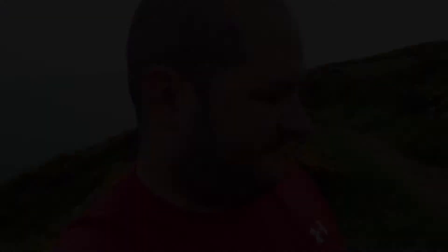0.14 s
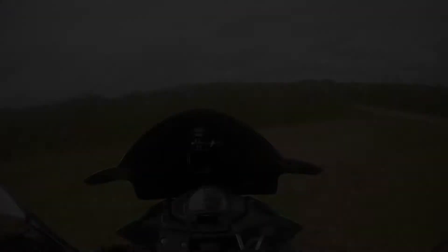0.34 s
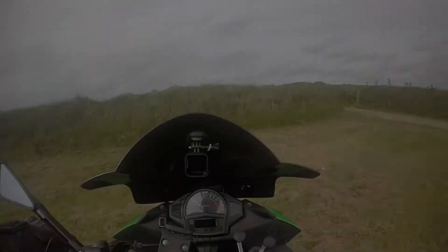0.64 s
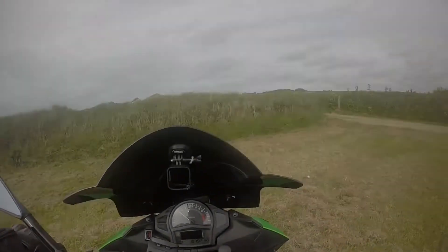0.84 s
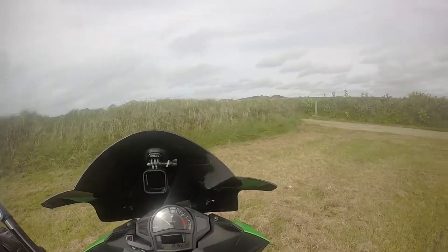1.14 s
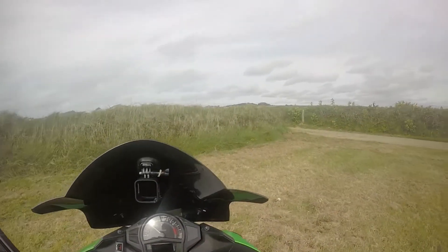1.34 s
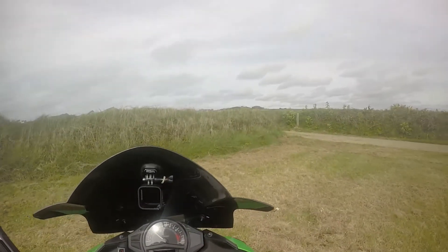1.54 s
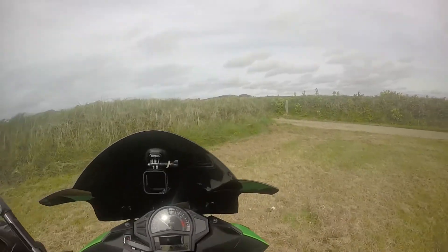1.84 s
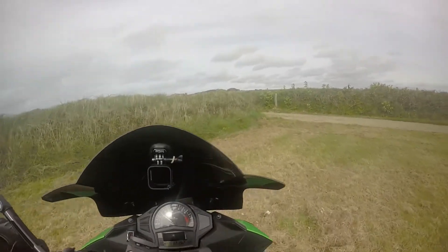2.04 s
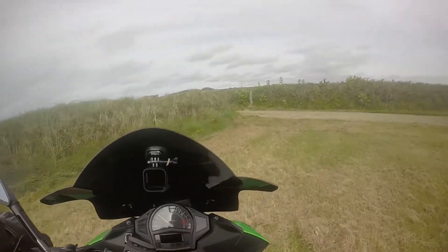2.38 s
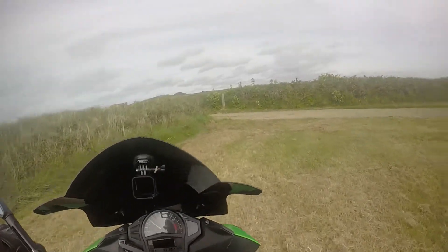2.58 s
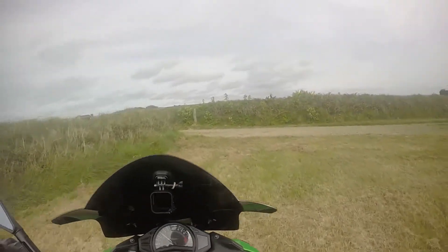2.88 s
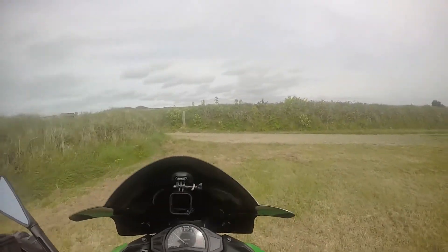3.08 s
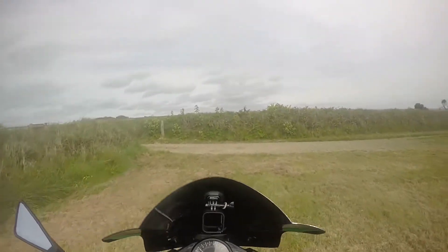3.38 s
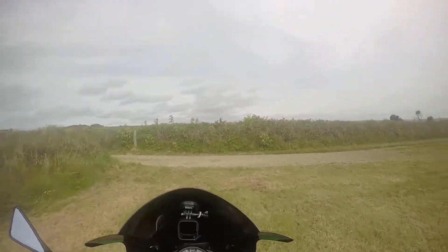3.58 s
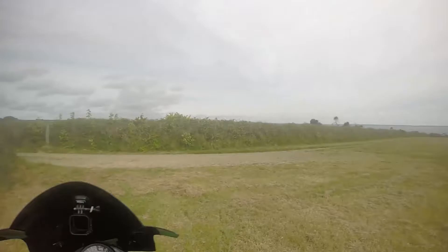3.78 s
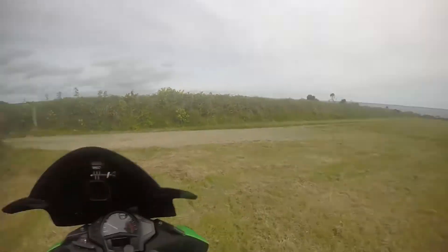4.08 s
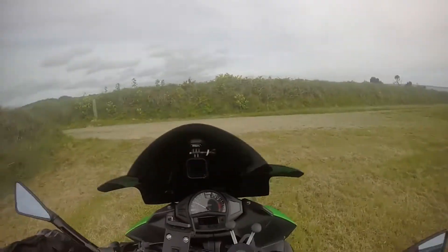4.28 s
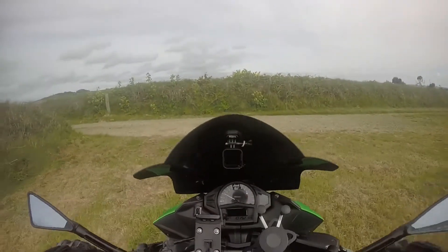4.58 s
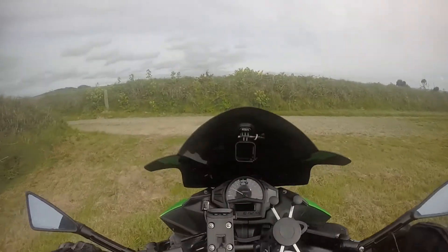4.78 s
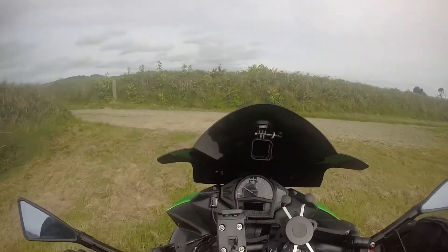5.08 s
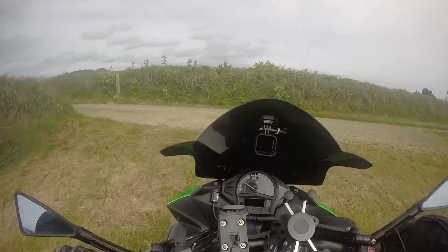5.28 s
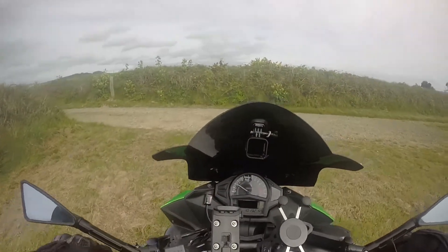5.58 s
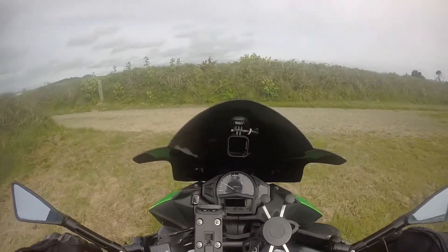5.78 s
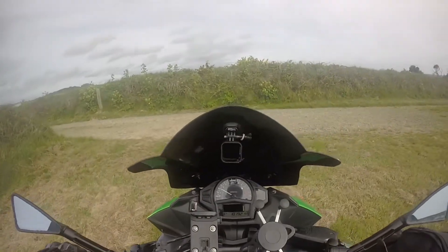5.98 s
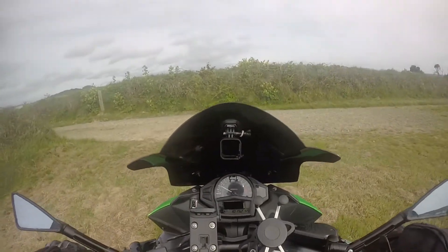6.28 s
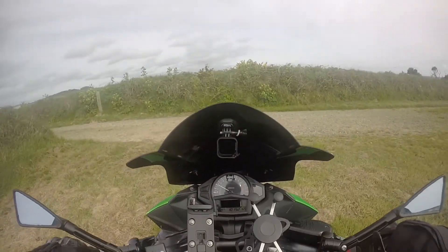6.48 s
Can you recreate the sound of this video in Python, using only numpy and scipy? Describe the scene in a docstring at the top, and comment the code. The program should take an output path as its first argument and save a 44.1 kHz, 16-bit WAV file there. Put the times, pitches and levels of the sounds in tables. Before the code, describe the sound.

From the rider's head, outdoors with hardly any echo: a brief quiet breeze gives way to a motorcycle twin swelling up over most of a second. Its deep, throaty throb rises and falls slightly, with an airy intake hiss. Halfway it drops and stumbles, clunks softly through the frame, coughs, then idles lower and lumpier. Loose fairing plastic buzzes and ticks, while tyres swish faintly through taller grass.

```python
"""Dry grass and gravel beside a hedge: a parallel-twin motorcycle rolls past them, heard at the rider's helmet.
A faint filtered-noise breeze fades out and the engine fades in on a little throttle.
At 3.3 s the throttle shuts and it stumbles down to idle: paired firing impulses boom in tuned resonances.
Shaped noise adds gas rasp, gear whirr, valve and intake hiss, tyres in grass and frame rumble.
Loose plastic buzzes on the hardest pressure swings and ticks at set moments."""
import sys
import numpy as np
from scipy import signal
from scipy.fft import rfft, irfft, next_fast_len
from scipy.io import wavfile
from scipy.ndimage import uniform_filter1d, map_coordinates

SR = 44100
rng = np.random.default_rng(int(sys.argv[2]) if len(sys.argv) > 2 else 0)


def materialize(psi):
    """Save the field psi as 16-bit PCM at rate SR to the path in sys.argv[1].

    A 1-D psi becomes a single channel; in a 2-D psi each row is a channel.
    """
    bounded = np.clip(np.atleast_2d(psi).T, -1, 1)
    quanta = np.round(bounded * 32767).astype(np.int16)
    wavfile.write(sys.argv[1], SR, quanta)


N = 292383
TIME = np.arange(N) / SR

# the throttle is open until SHUT_S, then its airflow dies away with time constant CLOSE_S
SHUT_S, CLOSE_S = 3.26, 0.19
# coasting: gears and valves run quieter (centre s, half length s)
COAST = (3.85, 0.45)


def amp(db):
    """Decibels to gain."""
    return 10 ** (np.asarray(db) / 20)


def unit(x):
    """Scale to rms 1."""
    return x / np.sqrt(np.mean(x ** 2) + 1e-20)


def along(points, hz):
    """Read (Hz, value) points on a log frequency axis."""
    f, v = np.transpose(points)
    return np.interp(np.log(hz + 1), np.log(f + 1), v)


def wobble(rate):
    """A smooth random curve with rate knots a second."""
    knots = rng.standard_normal(int(N * rate / SR) + 4)
    return map_coordinates(knots, [TIME * rate])


def swell(s, half_s):
    """A bell of height 1 around the moment s."""
    return np.exp(-((TIME - s) / half_s) ** 2)


def filtered(x, response):
    """Shape x by a complex response of frequency."""
    size = next_fast_len(N + SR // 2)
    spectrum = rfft(x, size) * response(np.fft.rfftfreq(size, 1 / SR))
    return irfft(spectrum, size)[..., :N]


def ring(x, modes):
    """Pass x through parallel resonances; listed neighbours swing against each other."""
    def response(f):
        total = 0
        for k, (centre, width, db) in enumerate(modes):
            damping = 1j * f * width
            total = total + (-1) ** k * amp(db) * damping / (centre * centre - f * f + damping)
        return total
    return filtered(x, response)


def kicks(times, sizes):
    """One impulse at each time."""
    return np.bincount(np.round(times * SR).astype(int), sizes, N)[:N]


def rush(spectrum, alike=None):
    """Stereo noise of rms 1: mid and side are balanced to set how alike left and right are."""
    # default left-right likeness: f/Hz, correlation (0-1)
    likeness = [(150, .97), (600, .95), (1000, 0.8), (2000, .45), (4000, 0.4), (12000, 0)] if alike is None else alike

    def mid_side(hz):
        turn = np.arccos(np.clip(along(likeness, hz), -1, 1)) / 2
        return amp(along(spectrum, hz)) * [np.cos(turn), np.sin(turn)]
    mid, side = filtered(rng.standard_normal((2, N)), mid_side)
    return unit(np.array([mid + side, mid - side]))


def throttle(at=TIME):
    """Airflow through the throttle, 1 open to 0 shut."""
    return np.exp(-np.maximum(at - SHUT_S, 0) / CLOSE_S)


def bark(soft=0.14):
    """Sharpness of the exhaust's pressure fronts, soft between the moments when it hardens to a bark."""
    # barks of the exhaust: t/s, half length/s, added sharpness
    barks = [(1.1, .2, 0.2), (2.698, 0.14, 0.4), (4.002, .23, 1.1), (4.848, 0.69, 0.3)]
    return soft + sum(sharpness * swell(s, half_s) for s, half_s, sharpness in barks)


def loaded(idle_db, open_db, coast_db):
    """Gain of a moving part: raised by open throttle, lowered while the engine coasts."""
    return amp(idle_db + open_db * throttle() - coast_db * swell(*COAST))


def breeze(level_db=-50):
    """Soft wind over open ground: mostly low noise with a lightly fluttering level."""
    # wind spectrum: f/Hz, relative level/dB
    wind_spectrum = [(18, -30), (30, -3), (76, 1), (274, -11.5), (311, -10), (383, -10.5), (766, -16.5),
                     (1250, -19.5), (1490, -18.5), (14000, -53.5)]
    return amp(level_db + 1.9 * wobble(12)) * rush(wind_spectrum)


def hedge(pressure, echo_db=-24, t60=0.11):
    """The ground and the hedge scatter a faint answer: a decaying noise tail, unlike on the two sides."""
    t = TIME[:SR // 4]
    tail = rng.standard_normal((2, len(t))) * amp(-60 * t / t60)
    tail = tail / np.linalg.norm(tail[0])
    return amp(echo_db) * signal.fftconvolve(pressure[None], tail, axes=1)[:, :N]


def tyres(short_grass_db=-70.5, tuft_s=0.1, grit_db=2.0):
    """The tyres crackle through dry grass as gritty treble noise, swishing louder in taller tufts."""
    # taller tufts: t/s, level/dB over the short grass
    tufts = [(1.081, 10.5), (2.72, 5), (3.82, 6), (5.72, 2.5), (6.23, 8)]
    # grass spectrum: f/Hz, relative level/dB
    grass_spectrum = [(3000, -40.5), (7000, -8.5), (10500, 0), (13000, -2.5), (15500, -6)]
    level_db = short_grass_db + sum(db * swell(s, tuft_s) for s, db in tufts)
    crackle = unit(amp(grit_db * wobble(900)))
    return amp(level_db) * crackle * rush(grass_spectrum) * amp([[-2.5], [2.5]])


def shudder(steady_db=-39.5, slack_db=-24):
    """Chain and frame rumble, most when the drive goes slack just after the throttle shuts."""
    # rumble spectrum: f/Hz, relative level/dB
    rumble_spectrum = [(15, -20), (30, -5.5), (55, -1.5), (75, 2), (130, -2.5), (200, -9), (400, -43),
                       (800, -91)]
    slack = swell(3.385, 0.095)  # centre s, half length s
    return (amp(steady_db) + amp(slack_db) * slack) * rush(rumble_spectrum, [(100, 1.0)])


def intake(level_db=-62):
    """Air hisses through the open intake and dies away with the throttle's airflow."""
    # intake spectrum: f/Hz, relative level/dB
    intake_spectrum = [(1600, -42), (1950, 9), (2250, -12.5), (2850, 0.5), (3400, -14), (7000, -16),
                       (8000, -5.5), (8600, -13), (10000, -28)]
    return amp(level_db) * throttle() * rush(intake_spectrum) * amp([[-1], [1]])


def valves(pulse):
    """The valve gear hisses, pulsing with the firings and flickering fast at random."""
    # hiss spectrum: f/Hz, relative level/dB
    hiss_spectrum = [(600, -39.5), (1500, -2), (1980, 3), (2400, 0), (2850, -1.5), (3800, -4), (5000, -6),
                     (6300, -9.5), (8200, -13), (9300, -16), (15000, -29)]
    flicker = unit(pulse * amp(2.2 * wobble(400)))
    level = loaded(idle_db=-55.5, open_db=2.1, coast_db=1.8)
    return level * flicker * rush(hiss_spectrum) * amp([[-.4], [.4]])


def gears(pulse):
    """The gears whirr as midrange noise that pulses with the firings."""
    # whirr spectrum: f/Hz, relative level/dB
    whirr_spectrum = [(60, -30.5), (150, 7.5), (290, 14.5), (350, 9.5), (430, 14), (560, 13.5), (700, 5.5),
                      (830, 4.5), (1000, 1.5), (1120, -2.5), (1177, 4.5), (1290, -6.5), (1750, -9),
                      (3500, -52)]
    return loaded(idle_db=-37, open_db=0.35, coast_db=3.6) * pulse * rush(whirr_spectrum)


def gas(flow, level_db=-46):
    """Gas rasps with each firing: noise follows the flow and gains from the bark."""
    # rasp spectrum: f/Hz, relative level/dB
    rasp_spectrum = [(170, -29), (260, -1), (330, -1.5), (420, 2), (560, -0.5), (650, -3.5), (720, -3),
                     (820, -5), (1000, -18), (1400, -23.5), (2500, -69.5)]
    return amp(level_db) * (1 + bark()) * flow * rush(rasp_spectrum, [(500, 1.0)])


def running(pressure, throb=0.38):
    """Noise of the moving bike: smoothed pressure power drives the gas and throbs in gears and valves."""
    power = np.abs(uniform_filter1d(pressure ** 2, size=300))
    flow = unit(power ** 0.41)
    pulse = unit(1 + throb * flow)
    return gas(flow) + gears(pulse) + valves(pulse) + intake() + tyres()


def rattle(pressure, push_slack=0.29, pull_slack=0.3, pull_share=.9, buzz_db=-33.5, scatter_db=1.5,
           tick_db=-7.5, tick_s=.0009):
    """Loose plastic buzzes when a pressure swing exceeds its slack, and ticks sharply at listed moments."""
    # plastic ticks: t/s, level/dB before the tick_db trim
    ticks = [(1.7983, -36.5), (1.9656, -38.5), (2.007, -35), (2.173, -37), (2.254, -37.5), (3.53, -35),
             (4.1031, -36), (4.1584, -35), (5.239, -35), (5.4056, -33.5), (5.7406, -34), (6.1875, -34),
             (6.2981, -37), (6.576, -37.5)]
    # plastic spectrum: f/Hz, relative level/dB
    plastic_spectrum = [(500, -30), (1500, 5.5), (2600, 2.5), (4500, -2.5), (7500, -11.5), (11000, -11),
                        (15500, -16)]
    push = np.maximum(pressure - push_slack, 0)
    pull = np.maximum(-pressure - pull_slack, 0)
    # the plastic answers the swing 0.8 ms later
    excess = np.interp(TIME - .0008, TIME, push + pull_share * pull)
    force = amp(buzz_db + scatter_db * wobble(70)) * excess
    for s, db in ticks:
        # each tick peaks 1 ms after its listed time
        force = force + amp(db + tick_db) * np.exp(-abs(TIME - s - .001) / tick_s)
    return force * rush(plastic_spectrum, [(1000, 0.81), (8000, .4)]) * amp([[-2], [2]])


def firings(cycle, scatter_db=0.12, second_db=-2, coast_second_db=0.46, rebound_db=2,
            steady_jitter_s=.00005, idle_jitter_s=.00013):
    """Firing times and sizes: the second cylinder trails by about half a crank turn; idle is less even."""
    # weak firings: t/s, level/dB against a normal firing
    misfires = [(3.342, -6), (3.517, -13.5), (4.146, -14.5)]
    lag = .24  # in cycles of two crank turns
    starts = np.arange(1, int(cycle[-1] - lag) + 1)
    times = np.interp(np.add.outer(starts, [0, lag]).ravel(), cycle, TIME)
    jitter_s = steady_jitter_s + idle_jitter_s * (1 - throttle(times))
    times = times + jitter_s * rng.standard_normal(len(times))
    # the second cylinder is weaker, a little less so while coasting
    offset_db = second_db + coast_second_db * np.interp(times, TIME, swell(*COAST))
    is_second = np.arange(len(times)) % 2
    db = offset_db * is_second + scatter_db * rng.standard_normal(len(times))
    for s, weak_db in misfires:
        weak = np.argmin(abs(times - s))
        db[weak] += weak_db
        # the firing after a weak one comes harder
        db[weak + 1] += rebound_db
    return times, amp(db)


def pipes(times, sizes, open_db=0.5, idle_db=0.02):
    """Firings boom in airbox and exhaust, crossfading from open-throttle to shut-throttle resonances."""
    # resonances with the throttle open: f/Hz, width/Hz, level/dB
    pipe_open = [(84, 9.9, 38), (140.6, 66.04, 48), (161.43, 68.45, 47), (345, 40.3, 26), (425, 126, 26),
                 (712.6, 73.2, 29.5), (708.3, 77.4, 28.5), (591.8, 57, 24)]
    # resonances with the throttle shut: f/Hz, width/Hz, level/dB
    pipe_shut = [(95.3, 46.1, 40.35), (72.15, 18.3, 42.13), (145.13, 58.93, 47.8), (153.7, 77.4, 46.7),
                 (350.9, 133.2, 39.8), (364.3, 183.4, 39.0), (628.8, 150.9, 33.7), (641.7, 110.2, 32.7)]
    # part of each blow that the bark brings out: f/Hz, level/dB
    edge = [(380, -32.5), (500, -6), (650, -1.5), (780, 11), (880, -4), (1100, -33)]
    opening = throttle(times)
    open_boom = amp(open_db) * ring(kicks(times, sizes * opening), pipe_open)
    shut_boom = amp(idle_db) * ring(kicks(times, sizes * (1 - opening)), pipe_shut)
    boom = open_boom - shut_boom
    # a steeper pressure front carries more upper harmonics
    return boom + bark() * filtered(boom, lambda hz: amp(along(edge, hz)))


def casing(times, sizes):
    """Each firing knocks the engine casing with its own random strength and makes it ring."""
    # casing resonances: f/Hz, width/Hz, level/dB
    casing_modes = [(701, 49, 7), (796, 69, 1.5), (950, 77, -16), (1177, 44, -4.5)]
    strength = amp(1.3 * rng.standard_normal(len(times)))
    return ring(kicks(times, sizes * strength), casing_modes)


def engine(cycle, muffle_hz=1050):
    """Pipe boom and casing knock pass the silencer; slow engine rocking is added as sines."""
    times, sizes = firings(cycle)
    blows = pipes(times, sizes) + casing(times, sizes)
    # rocking at once and twice the cycle rate
    rocking = amp(-42) * np.sin(2 * np.pi * cycle) + amp(-48) * np.sin(4 * np.pi * cycle)
    # the silencer rounds off each blow
    return filtered(blows, lambda hz: 1 / np.sqrt(1 + (hz / muffle_hz) ** 8)) + rocking


def engine_cycle():
    """Running count of engine cycles, summed from the cycle rate."""
    # engine speed, two crank turns a cycle: t/s, f/Hz
    speed = [(0.337, 23.856), (0.56, 25.62), (0.948, 27.067), (1.447, 24.414), (1.878, 23.737),
             (2.561, 25.374), (2.963, 24.81), (3.219, 25.214), (3.334, 23.88), (3.389, 20.257),
             (3.454, 24.14), (3.505, 19.791), (4.192, 18.248), (4.372, 18.576), (4.526, 17.948),
             (4.955, 18.386), (5.721, 17.827), (6.739, 18.137)]
    s, rate = np.transpose(speed)
    return np.cumsum(np.interp(TIME, s, rate)) / SR


def ports(x, lag=.00013, shade_hz=850):
    """Treble reaches the right microphone port just before the left; bass wraps round the helmet to both."""
    def response(hz):
        delay = lag * hz ** 4 / (hz ** 4 + shade_hz ** 4)
        return np.exp(1j * np.pi * hz * delay * np.array([[-1], [1]]))
    return filtered(x, response)


def scene():
    """The breeze fades out, then the motorcycle fades in."""
    pressure = engine(engine_cycle())
    direct = ports(pressure + rattle(pressure) + running(pressure))
    bike = direct + hedge(pressure) + shudder()
    breeze_fade = np.interp(TIME, (0.081, 0.27), [1, 0])
    bike_fade = np.interp(TIME, (0.27, 1.013), [0, 1])
    return breeze() * breeze_fade + bike * bike_fade


def record(dry, top_hz=15300):
    """A steep low-pass: nothing above the band limit gets through."""
    return filtered(dry, lambda hz: hz < top_hz)


dry = scene()
out = record(dry)
materialize(out)
```